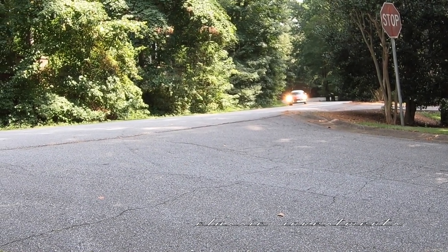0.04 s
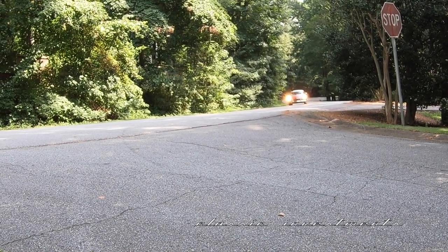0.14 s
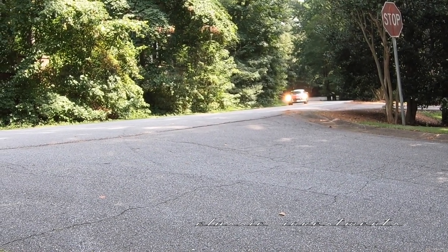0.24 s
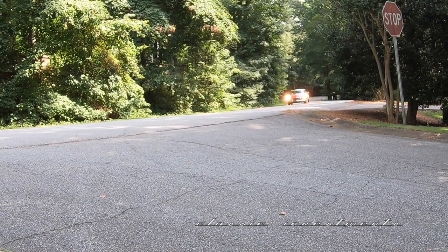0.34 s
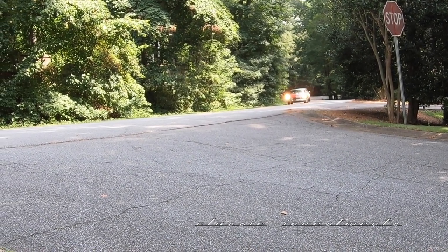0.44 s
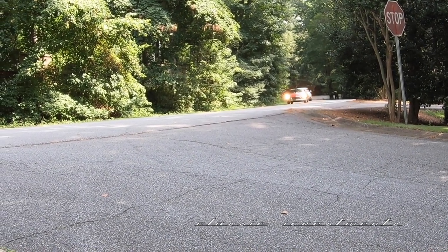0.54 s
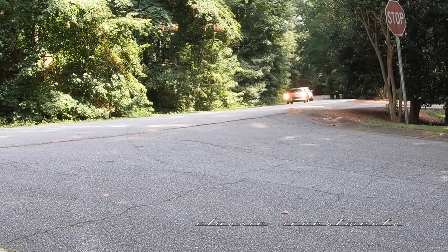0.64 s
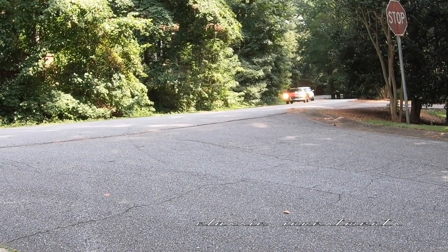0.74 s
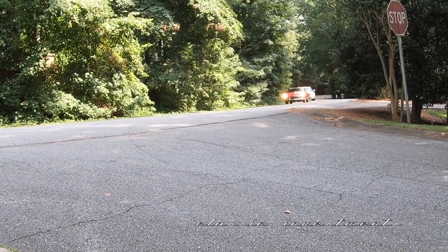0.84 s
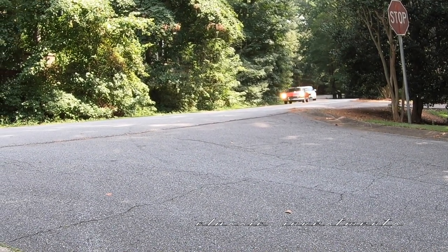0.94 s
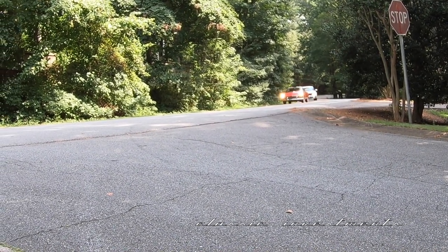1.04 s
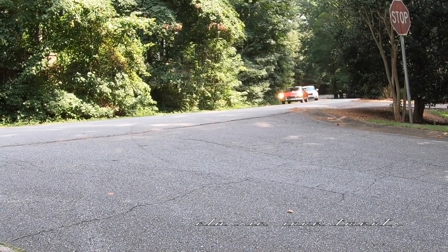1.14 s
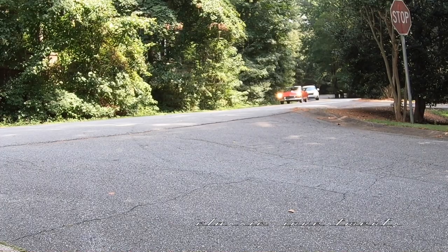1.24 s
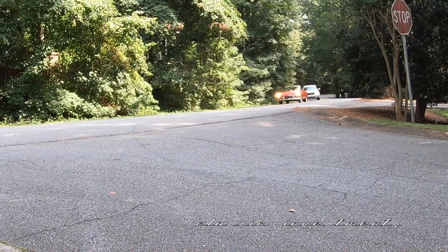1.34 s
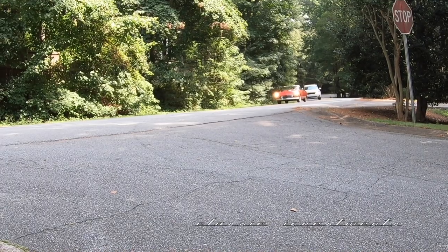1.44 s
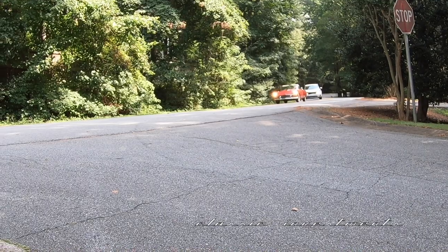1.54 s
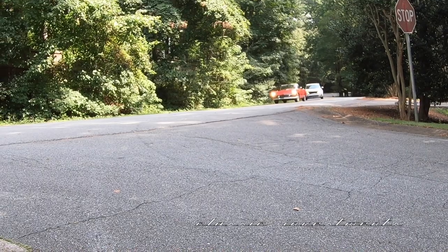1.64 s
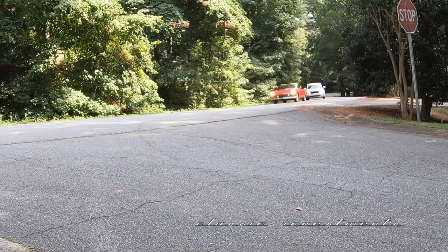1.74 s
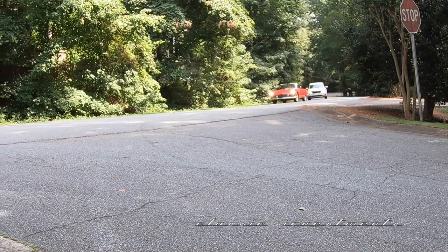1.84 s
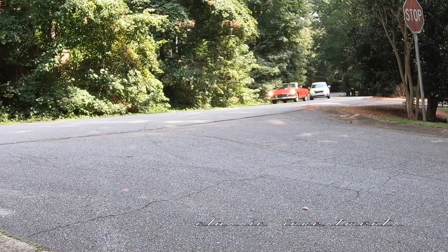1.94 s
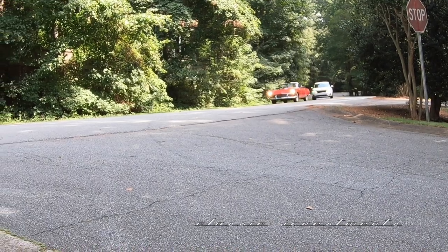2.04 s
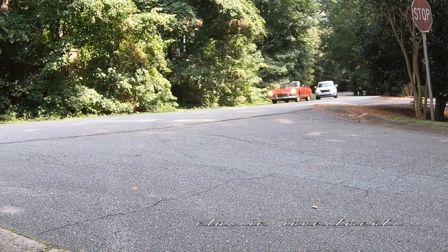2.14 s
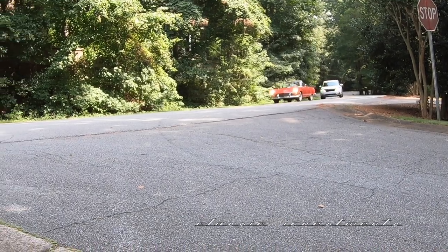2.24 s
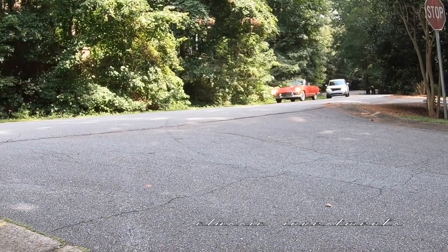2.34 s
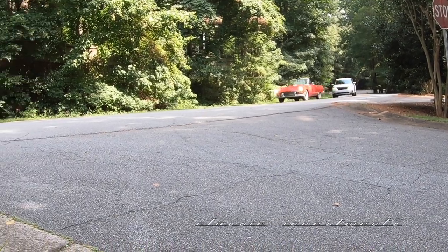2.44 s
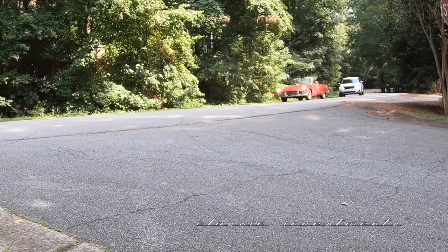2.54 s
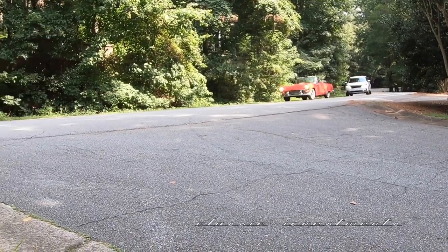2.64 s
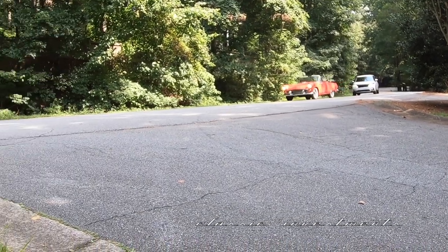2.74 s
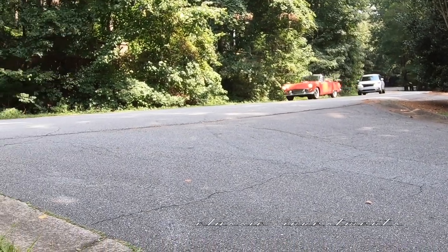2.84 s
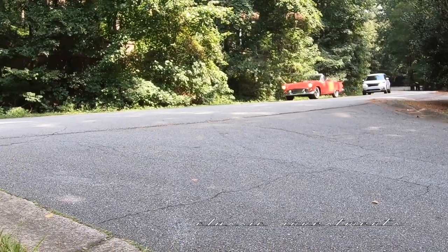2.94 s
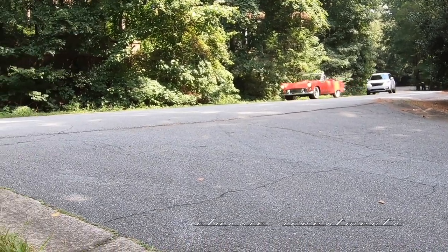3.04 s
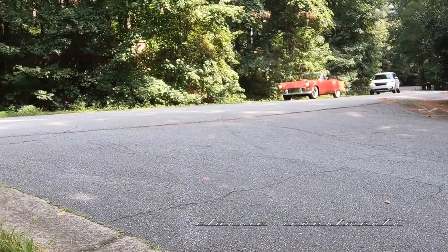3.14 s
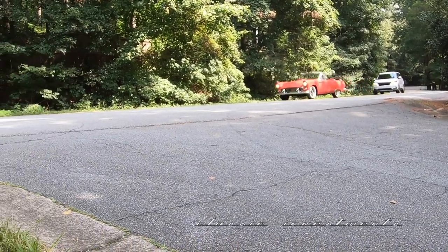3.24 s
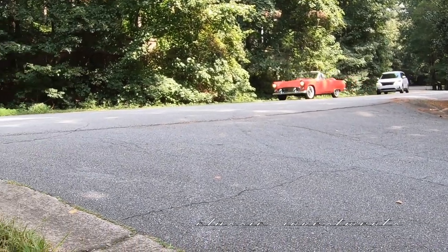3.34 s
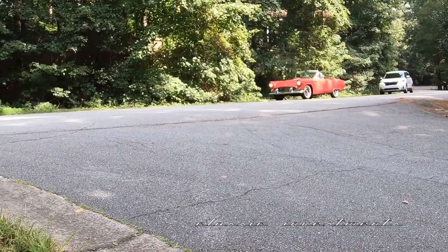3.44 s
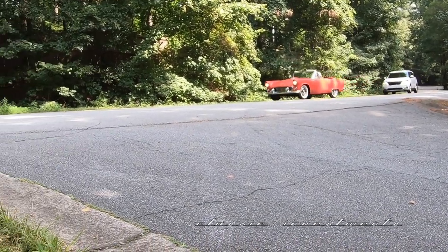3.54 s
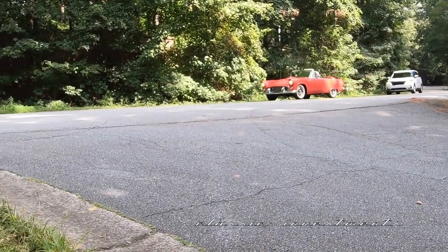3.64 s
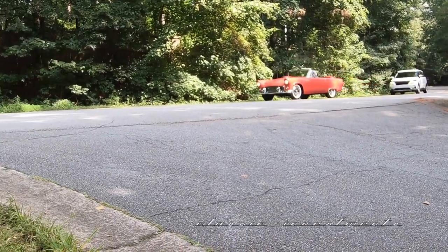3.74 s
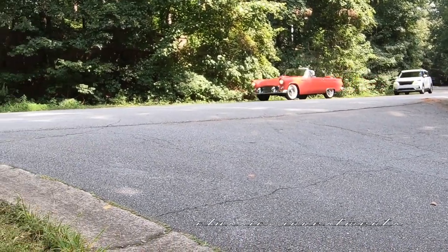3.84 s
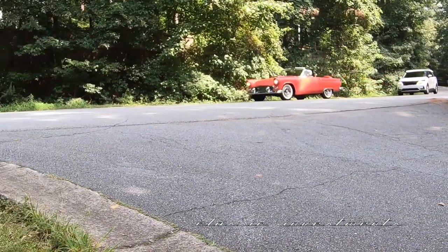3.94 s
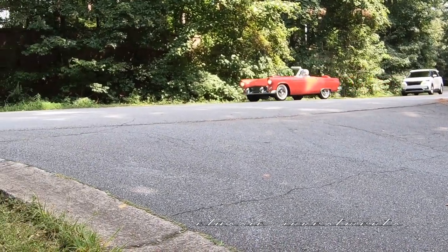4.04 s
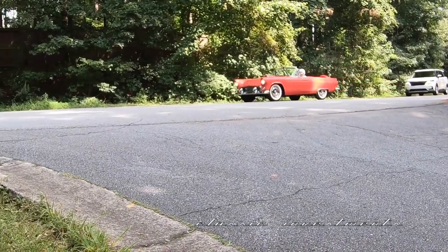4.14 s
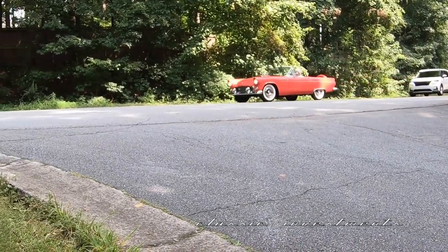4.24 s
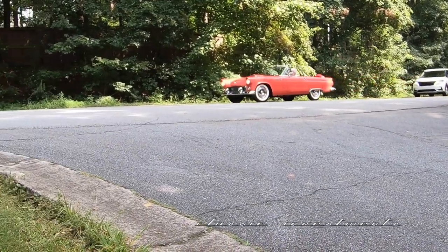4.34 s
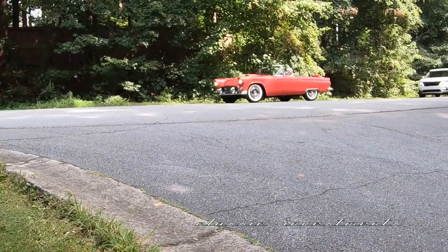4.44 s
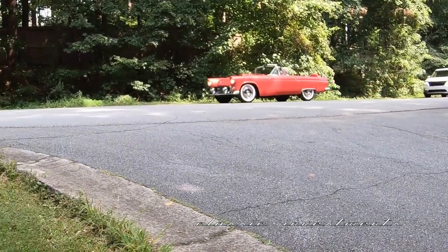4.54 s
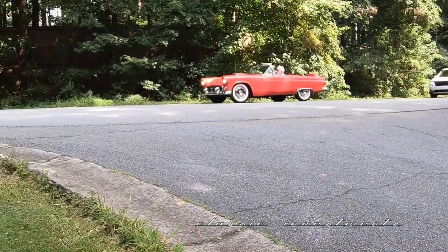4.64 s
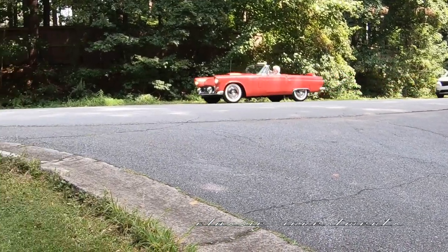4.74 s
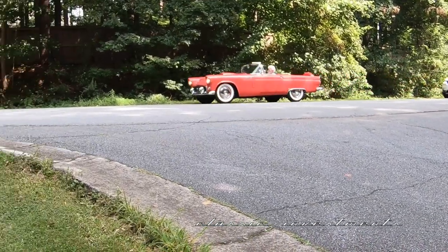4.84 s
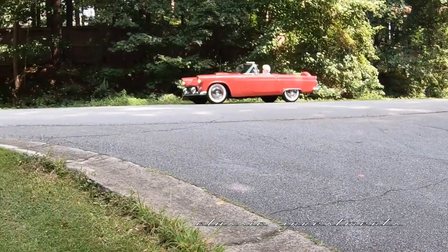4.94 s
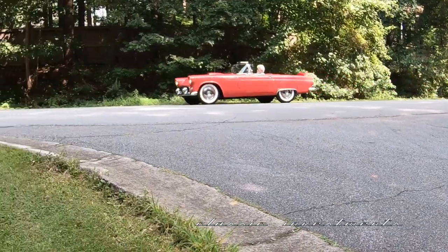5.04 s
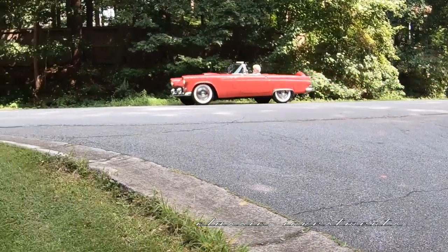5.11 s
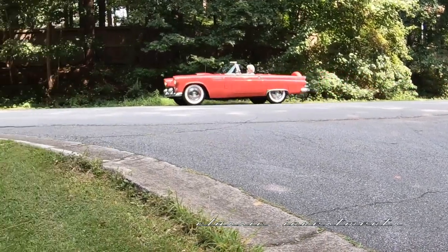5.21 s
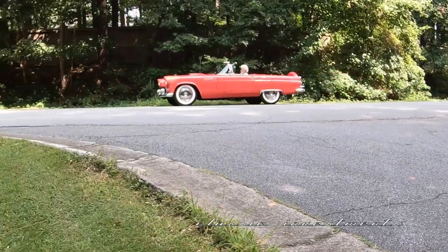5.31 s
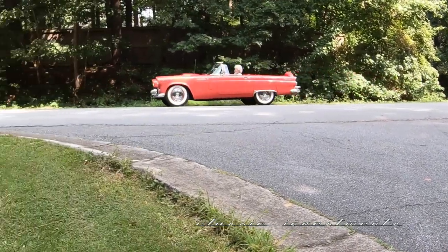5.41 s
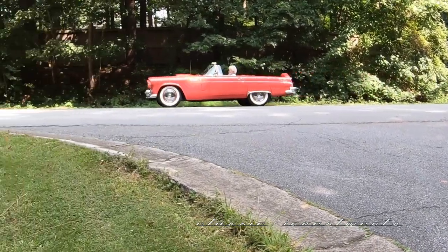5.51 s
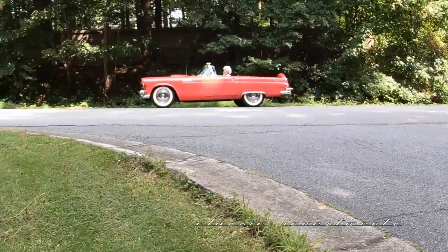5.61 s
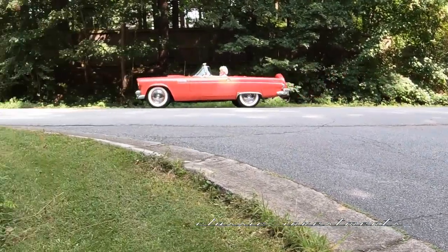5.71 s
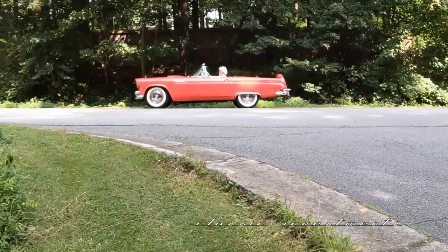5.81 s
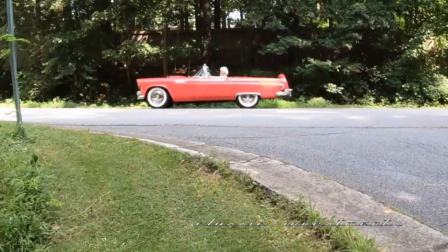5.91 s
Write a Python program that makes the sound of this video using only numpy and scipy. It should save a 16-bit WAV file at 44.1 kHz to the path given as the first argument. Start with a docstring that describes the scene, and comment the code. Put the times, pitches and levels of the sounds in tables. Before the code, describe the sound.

A mono roadside take of a slow car coming nearer. At first insects in the trees stand out over a soft road noise; then a lumpy low thump, deep burble and wavering drone of a V8 exhaust build up, with tyre hiss on asphalt and small rough ticking rings near the close. Brief gliding bird chirps come mid-way and late. It ends before the car recedes.

```python
"""An old V8 rolls up a wooded street at little more than idle, coming closer until just short of the microphone.
Harmonics of the engine cycle, a thump and throbbing gas noise make its loping drone; its tyres are coloured noise.
Cicadas (sums of harmonics), a katydid and a far chorus (coloured noise) buzz in the trees.
A small bird chirps in gliding tones over the faint rumble of distant traffic and moving air.
"""
import sys
import numpy as np
from scipy import signal
from scipy.fft import rfft, irfft, next_fast_len
from scipy.io import wavfile
from scipy.ndimage import uniform_filter1d, map_coordinates

SR = 44100
rng = np.random.default_rng(int(sys.argv[2]) if len(sys.argv) > 2 else 0)


def output_pcm(signal):
    """Save a mono or channel-first signal as 16-bit PCM at the path in sys.argv[1].

    Samples are clipped to [-1, 1] before scaling.
    """
    pcm = np.clip(np.atleast_2d(signal).T, -1, 1) * 32767
    wavfile.write(sys.argv[1], SR, np.round(pcm).astype(np.int16))


N = 263277  # length in samples

# Engine speed on the way up the street. Each row: time in seconds, crank speed in rpm.
ENGINE_SPEED = [(0, 917), (1, 868), (1.75, 849), (2.3, 850.3), (2.7, 827.8), (3.7, 819), (4.15, 798.3),
                (5, 803), (5.45, 819), (5.97, 849)]
# The straight pass: when the car would draw level, how far from the microphone, and how fast it rolls.
LEVEL_AT_S, CLOSEST_M, CAR_M_PER_S = 6.3, 14.3, 6.83


def amp(db):
    """Decibels to gain."""
    return 10 ** (np.asarray(db) / 20)


def unit(x):
    """x at rms 1."""
    return x / np.sqrt(np.mean(x ** 2) + 1e-20)


def clock():
    """The time of each sample, in seconds."""
    return np.arange(N) / SR


def along(points, hz):
    """(Hz, value) points read on a log frequency axis."""
    f, v = np.transpose(points)
    return np.interp(np.log(hz + 1), np.log(f + 1), v)


def curves(rows):
    """One value per sample for each column after the time."""
    s, *cols = np.transpose(rows)
    return [np.interp(clock(), s, c) for c in cols]


def swell(s, half):
    """A bell-shaped curve that peaks at 1 at time s."""
    return np.exp(-.5 * ((clock() - s) / half) ** 2)


def wobble(rate):
    """A smooth random curve, rate knots a second."""
    coarse = np.arange(0, N + 64, 64)
    knots = rng.standard_normal(2048)
    values = map_coordinates(knots, [coarse * rate / SR + 2], mode="wrap")
    return np.interp(np.arange(N), coarse, values)


def filtered(x, response):
    """x times a response of frequency."""
    size = next_fast_len(N + SR // 2)
    spectrum = rfft(x, size)
    return irfft(spectrum * response(np.fft.rfftfreq(size, 1 / SR)), size)[:N]


def noise(spectrum, gate=1):
    """Noise gated, then coloured, then brought to rms 1."""
    return unit(filtered(gate * rng.standard_normal(N), lambda hz: amp(along(spectrum, hz))))


def patchy(x, depth_db):
    """x with a random gain that differs from band to band and from moment to moment."""
    z = signal.stft(x, nperseg=1024)[2]
    field = uniform_filter1d(rng.standard_normal(z.shape), 4, 0)  # smooth over frequency
    field = uniform_filter1d(field, 6, 1)  # smooth over time
    return unit(signal.istft(z * amp(depth_db * unit(field)), nperseg=1024)[1][:N])


def trees(x, t60, wet_db):
    """x with the diffuse answer of the wood's edge: a decaying noise tail."""
    t = np.arange(SR) / SR
    tail = rng.standard_normal(SR) * amp(-60 * t / t60)
    return x + amp(wet_db) * signal.fftconvolve(x, tail / np.linalg.norm(tail))[:N]


def nearness():
    """The closest distance over the present one: it would reach 1 as the car draws level."""
    return CLOSEST_M / np.hypot(CLOSEST_M, CAR_M_PER_S * (clock() - LEVEL_AT_S))


def approach(level_db, growth):
    """Gain of one of the car's sounds: level_db side-on, growing by growth dB per dB of nearness."""
    return amp(level_db) * nearness() ** growth


def distant_air():
    """Distant traffic and moving air: steady noise, mostly low."""
    # Colour of the rumble. Each row: frequency in Hz, relative level in dB per Hz.
    air = [(4, 0.5), (15, -2.5), (32, -7), (60, -9), (120, -12), (200, -17.5), (310, -32.5), (500, -26.5),
           (850, -53), (1100, -22.5), (1400, -39), (2200, -33), (4000, -52)]
    return amp(-44) * noise(air)


def far_insects():
    """A far chorus of insects blurred to a hiss."""
    # Level of the chorus. Each row: time in seconds, level in dB.
    chorus_level = [(0, -57.5), (2.3, -64), (3.8, -62.5), (5.97, -73)]
    # Colour of the chorus. Each row: frequency in Hz, relative level in dB per Hz.
    chorus_colour = [(2500, -30), (3800, 0.5), (5000, -3), (6500, -0.5), (7800, 3.5), (8600, 0.5),
                     (9600, -9), (10500, -28), (13000, -37)]
    return amp(curves(chorus_level)[0]) * noise(chorus_colour)


def katydid():
    """Fast wing strokes rasp a narrow band of noise."""
    # Colour of the rasp. Each row: frequency in Hz, relative level in dB per Hz.
    wing_colour = [(6200, -22), (6800, -31), (7000, -4), (7200, 8), (7380, 9), (7520, 13), (7680, 2.5),
                   (8000, -5), (9000, -45)]
    strokes = np.cumsum(23.2 + 0.8 * wobble(10)) / SR  # about 23 strokes a second
    angle = 2 * np.pi * strokes
    rasp = 1 + 0.21 * np.cos(angle) + 0.2 * np.cos(2 * angle) + 0.31 * np.cos(3 * angle)
    return amp(-57 + 0.32 * wobble(3.7)) * noise(wing_colour, rasp)


def cicadas(fade_db, jitter_hz):
    """Each swells and fades; two tymbals buckle in turn, their drifting balance favours odd or even harmonics."""
    # One cicada in each row: start in seconds, loudest moment in seconds, end in seconds,
    # fundamental of the tymbal buzz in Hz at the start, its rise in Hz per second, level in dB at the loudest,
    # dB of odd over even harmonics at the start, the same at the end, dB added to the body's main ring,
    # dB added to its low modes, fades of each harmonic in knots a second.
    singers = [(-.15, 1.7, 4.8, 245.49, .55, -53.5, 6, -10, -6, 1.5, 2.5),
               (-.3, 2.9, 4.6, 264.96, .2, -58, 3, 2, -2, -9, 2.5),
               (.9, 3.5, 4.7, 248.55, .6, -58, 6, 8, -6, -10, 3),
               (4.6, 5.2, 6.2, 273.37, .3, -60.5, 3, 3, 0, 1, 8),
               (4.3, 5.4, 6.5, 269.24, .3, -54, 4, 8, 0, 1, 9)]
    # Resonances of the hollow abdomen. Each row: frequency in Hz, relative level in dB.
    abdomen = [(3600, -25), (4200, -10), (4450, -.5), (4580, -7), (4690, 0), (4950, -5), (5200, -7),
               (5420, -4), (5650, -4), (5920, 1), (6150, -7), (6400, -2), (6700, -1), (7300, 1), (8300, 0),
               (8850, 2), (9100, 1), (9330, -5), (9650, -3), (10100, -10), (10400, -19), (11500, -28)]
    # Single harmonics flare or dip. Each row: cicada's row from 0, harmonic number, peak time in seconds,
    # half length in seconds, gain in dB.
    flares = [(0, 19, 2.1, .3, 4), (0, 24, 1.45, .25, 3), (0, 41, 1.2, .9, 4), (0, 18, 3.3, .35, -3),
              (0, 18, 1.6, .35, 2), (0, 18, 4.5, .2, 7), (2, 37, 4.5, .2, 5), (4, 25, 4.7, .15, 3),
              (4, 17, 5.35, .15, 6), (0, 37, 1.2, .6, 3), (4, 31, 4.93, .06, 6), (4, 31, 5.28, .05, 6),
              (4, 33, 5.43, .04, 5), (4, 27, 5.52, .05, 14), (4, 25, 5.52, .05, 7), (4, 29, 5.55, .04, 7),
              (4, 25, 5.73, .06, 5), (4, 17, 5.88, .06, 7)]
    main_ring_hz, main_ring_width_hz, low_modes_below_hz = 7350, 450, 6600
    t = clock()
    orders = np.arange(15, 43)
    out = np.zeros(N)
    for number, singer in enumerate(singers):
        start, loudest, end, rate_hz, rise, db, odd_start_db, odd_end_db, ring_db, low_db, fades = singer
        phase = 2 * np.pi * np.cumsum(rate_hz + rise * (t - start) + jitter_hz * wobble(20)) / SR
        harmonic_hz = orders * rate_hz
        main_ring = np.exp(-((harmonic_hz - main_ring_hz) / main_ring_width_hz) ** 2)
        low_modes = harmonic_hz < low_modes_below_hz
        levels_db = along(abdomen, harmonic_hz) + ring_db * main_ring + low_db * low_modes
        odd = amp(np.interp(t, [start, end], [odd_start_db, odd_end_db]))
        even_odd = np.array([np.ones(N), odd]) / np.hypot(1, odd)
        buzz = np.zeros(N)
        # paths through the foliage make each harmonic fade and flare on its own
        for k, level in zip(orders, levels_db):
            flare = sum(gain * swell(s, half) for who, harmonic, s, half, gain in flares
                        if (who, harmonic) == (number, k))
            gain = even_odd[k % 2] * amp(level + flare + fade_db * wobble(fades))
            buzz += gain * np.sin(k * phase + 2 * np.pi * rng.random())
        envelope = np.sqrt(np.interp(t, [start, loudest, end], [0, 1, 0]))
        out += amp(db) * envelope * unit(buzz)
    return out


def bird():
    """A small bird's thin gliding chirps, smeared by the trees."""
    # Each row: start in seconds, length in seconds, start, middle and end pitch in Hz, peak level in dB
    # ahead of the smear.
    chirps = [(2.632, .055, 6300, 6800, 6750, -52), (2.714, .039, 5250, 5750, 5950, -55),
              (2.803, .048, 5300, 5750, 5700, -56.5), (2.918, .058, 7700, 8100, 8050, -51),
              (2.97, .055, 8350, 8400, 7700, -50.5), (3.108, .055, 8100, 7650, 7470, -45.5),
              (3.16, .04, 7600, 7750, 7520, -45.5), (5.43, .07, 8430, 8620, 8500, -52),
              (5.492, .04, 8520, 8250, 7750, -50.5)]
    out = np.zeros(N)
    for s, length, *path_hz, db in chirps:
        u = np.linspace(0, 1, round(length * SR))
        hz = np.interp(u, [0, .5, 1], path_hz) + 50 * wobble(286)[:len(u)]
        envelope = np.sqrt(np.abs(np.sin(np.pi * u)))
        tone = np.sin(2 * np.pi * np.cumsum(hz) / SR)
        out[round(s * SR):][:len(u)] += amp(db) * envelope * tone
    return trees(out, t60=0.28, wet_db=-4.5)


def engine_cycles():
    """Four-stroke cycles done so far: one for every two turns of the crank."""
    return np.cumsum(curves(ENGINE_SPEED)[0]) / (120 * SR)


def puffs(cycles, depth):
    """Gas flow: eight puffs a cycle, each as strong as its cylinder."""
    # Strength of each cylinder's puff in firing order; the bank with the nearer pipe is the stronger.
    # One column: relative strength [no unit].
    cylinders = [1.4, 0.34, 0.89, 0.67, 0.89, 1.2, 0.54, 0.71]
    firing = cycles * len(cylinders)
    strength = np.take(cylinders, firing.astype(int) % len(cylinders))
    return 1 + depth * (unit(strength * np.sin(np.pi * firing) ** 2) - 1)


def tyre_roar(cycles):
    """Patchy road roar, beamed forward by the tyres, with a trace of the engine's throb."""
    # Colour of the roar. Each row: frequency in Hz, relative level in dB per Hz.
    roar_colour = [(160, -7), (280, -5.5), (343, -8), (421, 0.5), (522, -1), (572, -1), (831, -5),
                   (985, -5), (1240, -10.5), (1530, -6.5), (1740, -10), (1880, -8.5), (2250, -10.5),
                   (2520, -11), (2780, -16.5), (4200, -24.5), (5460, -61), (9240, -120)]
    roar = patchy(noise(roar_colour, puffs(cycles, depth=.09)), depth_db=1.23)
    swell_db = 0.94 * swell(3.1, half=0.59)  # the roar swells slightly around 3 s
    broadside_db = -2 * nearness() ** 6  # the beam is lost towards side-on
    return approach(-43, growth=1.088) * amp(swell_db + broadside_db + 0.17 * wobble(12)) * roar


def tyre_sizzle():
    """A thin sizzle that the tyres beam ahead of the car, swelling and fading once."""
    # Colour of the sizzle. Each row: frequency in Hz, relative level in dB per Hz.
    sizzle_colour = [(2000, -30), (2250, -7), (2400, 11), (2520, -17), (2700, -37)]
    return amp(-63) * swell(2.48, half=0.82) * noise(sizzle_colour)


def tyre_hiss():
    """Flickering hiss of rubber on asphalt that comes through as the car nears."""
    # Colour of the hiss. Each row: frequency in Hz, relative level in dB per Hz.
    hiss_colour = [(900, -29), (1250, 21), (1480, 19.5), (1750, 16), (2300, 8), (3000, 10.5), (5000, 13.5),
                   (6300, 16), (8000, 19), (11000, 7), (13000, 2.5), (16000, 2)]
    return approach(-51.5, growth=0.78) * amp(0.78 * wobble(27)) * noise(hiss_colour)


def tread_song(loudest_s, half_s):
    """Air pumped from the grooves of the tread sings, loudest before the car draws level."""
    # Song of the tread. Each row: frequency in Hz, relative level in dB per Hz.
    grooves = [(450, -15), (660, 5), (800, -3), (920, -4), (1040, 2), (1200, -12), (1800, -29)]
    return amp(-53.5 + 0.6 * wobble(16)) * swell(loudest_s, half_s) * noise(grooves)


def short_rings(centre_s, spread_s, count=12):
    """Short rough rings near 1 kHz from the car: tones with a random flutter under a brief bell."""
    # The stronger rings, spaced by whole engine cycles or wheel turns.
    # Each row: time in seconds, nominal peak in dB (ring_db is added), pitch in Hz.
    strong = [(4.24, -41, 980), (4.385, -41, 1030), (4.575, -38.5, 990), (4.845, -36.5, 995),
              (5.02, -37.5, 945), (5.138, -31.5, 1000), (5.175, -36.5, 965), (5.425, -36, 953),
              (5.5, -38, 890), (5.708, -41, 982), (5.86, -37, 935)]
    half_s, ring_db = 0.012, -7.5
    # fainter rings at random: time in s, nominal peak in dB, pitch in Hz
    faint = [centre_s, -47.5, 1100] + rng.standard_normal((count, 3)) * [spread_s, 2, 35]
    out = np.zeros(N)
    for s, db, hz in [*strong, *faint]:
        rough = 1 + .35 * (wobble(130) + 1j * wobble(130))
        ring = np.real(rough * np.exp(2j * np.pi * hz * clock()))
        out += amp(db + ring_db) * swell(s, half_s) * ring
    return out


def engine_bay(cycles):
    """A throbbing whirr from under the bonnet, heard only from close by."""
    # Colour of the whirr. Each row: frequency in Hz, relative level in dB per Hz.
    whirr = [(700, -39), (900, -1.5), (1150, -16), (1450, -2.5), (1750, -17), (3000, -18.5), (4500, -21),
             (8000, -38)]
    return approach(-48.5, growth=6.1) * noise(whirr, puffs(cycles, depth=0.51))


def exhaust_note(cycles, order, unsteady):
    """One harmonic of the engine cycle, delayed by pipes and mufflers; uneven combustion makes it waver."""
    lag = rng.random()
    waver = (1 + unsteady * (wobble(7) + 1j * wobble(7))) / np.sqrt(1 + 2 * unsteady ** 2)
    return np.sqrt(2) * np.real(waver * np.exp(2j * np.pi * (order * cycles - lag)))


def firing_notes(cycles):
    """The firing note, eight to a cycle, with its overtones and the harmonic that the pipes boost to a drone."""
    # Level of the drone, which comes and goes on the way. Each row: time in seconds, level in dB.
    drone_level = [(0, -56.5), (.55, -52), (.95, -71), (1.2, -42), (1.42, -46.5), (1.62, -40), (1.85, -45),
                   (2.28, -36.5), (2.8, -40), (3.2, -43.5), (3.55, -39), (3.75, -39), (3.9, -35.5),
                   (4.15, -34), (4.55, -31), (5, -34), (5.35, -28), (5.75, -28.5), (5.97, -34.5)]
    # Level of the firing octave, strongest at mid distance. Each row: time in seconds, level in dB.
    octave_level = [(0, -63), (1, -55.5), (2.5, -43), (4, -50), (5.97, -73)]
    # Level of the firing note's third harmonic. Each row: time in seconds, level in dB.
    third_level = [(0, -58), (1.1, -53), (2.6, -53.5), (3.3, -56), (4.2, -52), (5.97, -51)]
    firing = approach(-41, growth=0.58) * exhaust_note(cycles, order=8, unsteady=.1)
    drone = amp(curves(drone_level)[0]) * exhaust_note(cycles, order=13, unsteady=.06)
    octave = amp(curves(octave_level)[0]) * exhaust_note(cycles, order=16, unsteady=.08)
    third = amp(curves(third_level)[0]) * exhaust_note(cycles, order=24, unsteady=.1)
    return firing + drone + octave + third


def thump(cycles):
    """Once a cycle two cylinders of one bank fire back to back; their joint puff knocks the pipe: the lope."""
    # Level of the thump, strongest while the car still faces this way. Each row: time in seconds, level in dB.
    thump_level = [(0, -43), (1.2, -38), (2.1, -33.5), (2.6, -29), (3.2, -30.5), (3.9, -36), (4.8, -38),
                   (5.97, -35)]
    # What the thump rings in the pipe. Each row: frequency in Hz, relative level in dB.
    pipe = [(130, -2), (162, 0), (245, -8)]
    place_in_cycle, attack_s, t60_s = .49, .004, .065
    age = (cycles - place_in_cycle) % 1 * 120 / curves(ENGINE_SPEED)[0]  # seconds since the last thump
    ring = sum(amp(db) * np.sin(2 * np.pi * hz * age) for hz, db in pipe)
    shape = (1 - np.exp(-age / attack_s)) * amp(-60 * age / t60_s)
    return amp(curves(thump_level)[0] + 1.5 * wobble(7)) * shape * ring


def burble_and_gas(cycles):
    """Burble of the uneven banks, and gas rushing through the mufflers in throbs."""
    # Burble. Each row: multiple of the engine cycle, relative level in dB.
    burble_orders = [(5, -11.5), (9, -9), (10, -11.5), (11, -1), (14, -9), (15, -8), (17, -8), (19, -8.5),
                     (21, -14), (23, -20.5), (25, -12), (27, -17.5), (32, -18.5), (36, -16)]
    # Colour of the gas rush. Each row: frequency in Hz, relative level in dB per Hz.
    muffler = [(25, -4), (50, -2), (90, -0.5), (125, -13), (170, -6), (205, -6.5), (245, -8.5),
               (290, -22.5), (400, -15), (800, -66)]
    # How hard the engine burbles, which also drives the gas. Each row: time in seconds, gain in dB.
    lope = [(0, -57), (1.4, -55.5), (2.4, -48.5), (3.2, -44), (3.7, -40), (4, -42), (4.9, -39.5),
            (5.3, -38), (5.97, -36)]
    burble = sum(amp(db) * exhaust_note(cycles, order=round(k), unsteady=.2) for k, db in burble_orders)
    sputter_db = 1.4 * swell(3.76, half=.08)  # the exhaust sputters briefly
    gas = amp(-5.5 + sputter_db) * noise(muffler, puffs(cycles, depth=0.21))
    return amp(curves(lope)[0]) * (burble + gas)


def exhaust(cycles):
    """All that leaves the tailpipes; it sags for a moment on each weak firing."""
    # Weak firings. Each row: time in seconds, gain in dB.
    stumbles = [(3.02, -7), (3.48, -10), (4.32, -5), (4.98, -7), (5.27, -9), (5.565, -11), (5.84, -10)]
    sag = amp(sum(db * swell(s, half=0.008) for s, db in stumbles))
    return sag * (firing_notes(cycles) + thump(cycles) + burble_and_gas(cycles))


def scene():
    """The car in front of the summer wood."""
    wood = distant_air() + far_insects() + katydid() + cicadas(fade_db=2.2, jitter_hz=.12) + bird()
    cycles = engine_cycles()
    tyres = tyre_roar(cycles) + tyre_sizzle() + tyre_hiss() + tread_song(loudest_s=4.54, half_s=0.71)
    rings = short_rings(centre_s=4.54, spread_s=0.355)
    car = tyres + rings + engine_bay(cycles) + exhaust(cycles)
    return (wood + car)[None]


def record(dry):
    """One microphone channel that keeps nothing above its band limit of 15.7 kHz."""
    return filtered(dry[0], lambda hz: hz < 15700)[None]


dry = scene()
out = record(dry)
output_pcm(out)
```